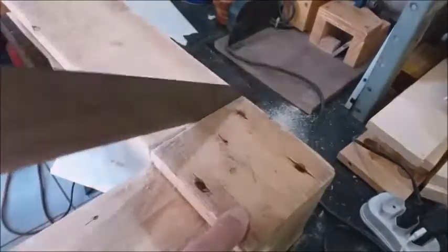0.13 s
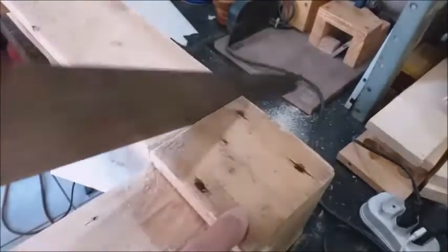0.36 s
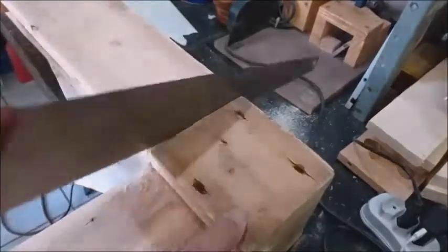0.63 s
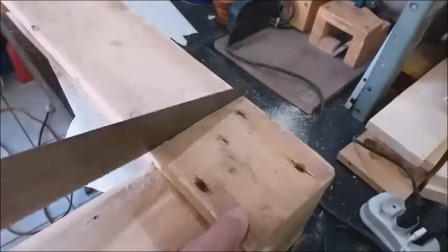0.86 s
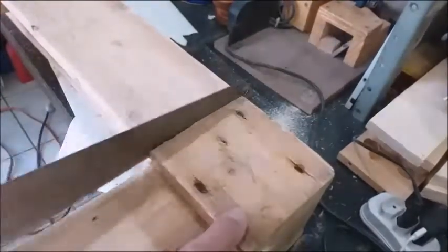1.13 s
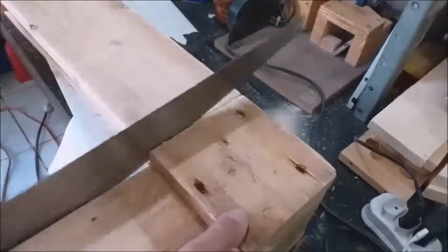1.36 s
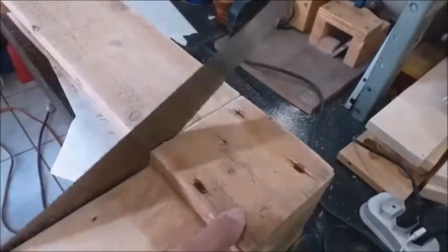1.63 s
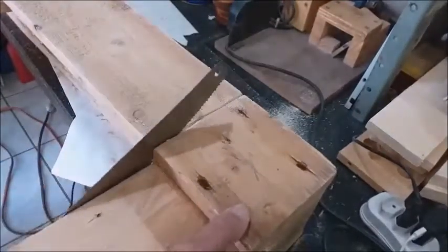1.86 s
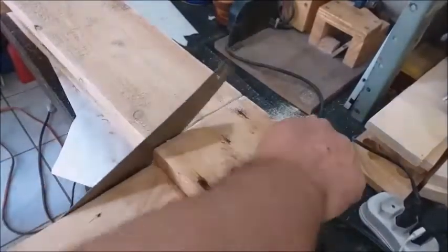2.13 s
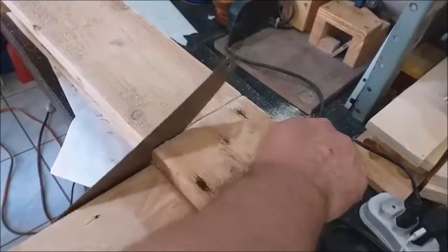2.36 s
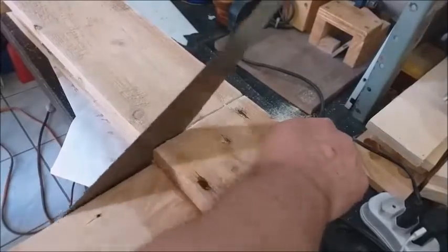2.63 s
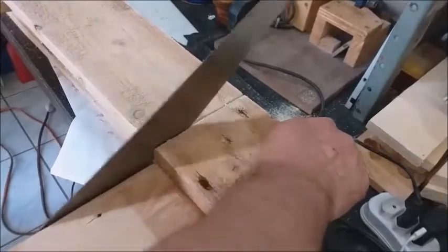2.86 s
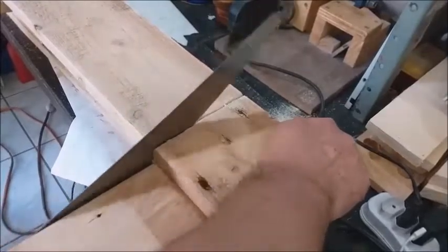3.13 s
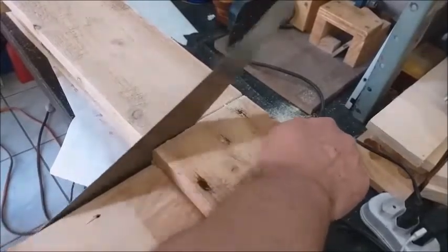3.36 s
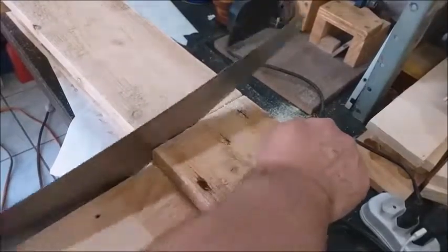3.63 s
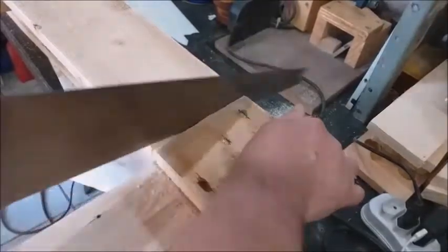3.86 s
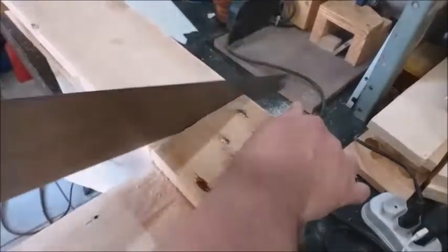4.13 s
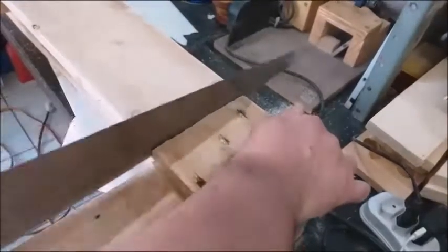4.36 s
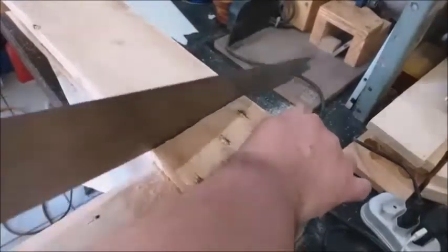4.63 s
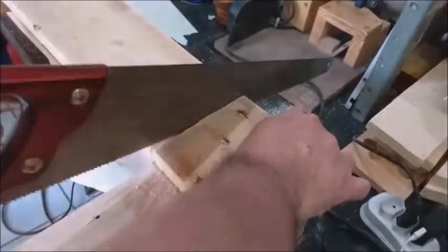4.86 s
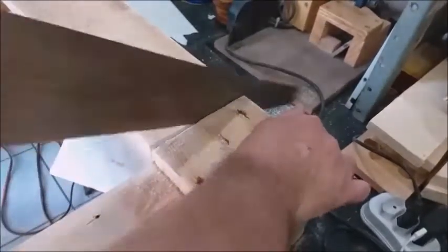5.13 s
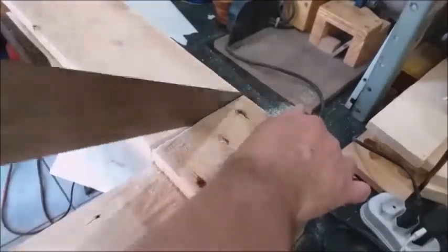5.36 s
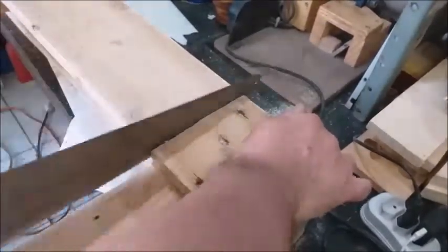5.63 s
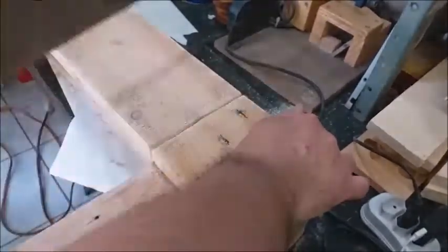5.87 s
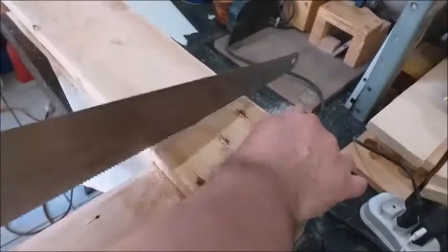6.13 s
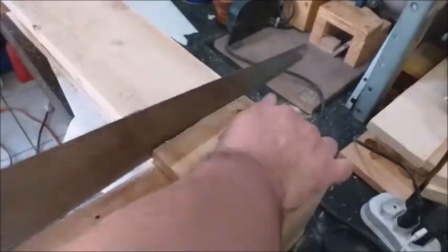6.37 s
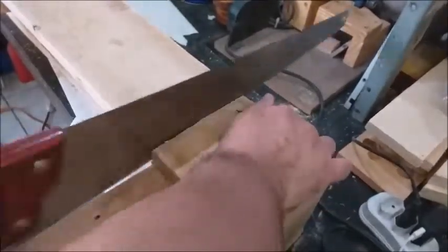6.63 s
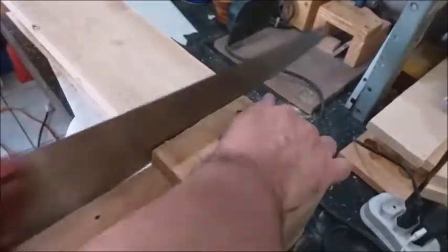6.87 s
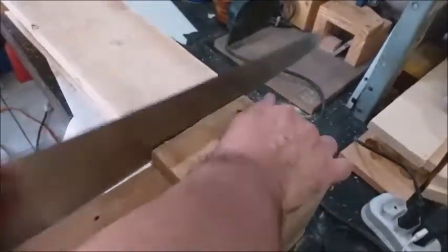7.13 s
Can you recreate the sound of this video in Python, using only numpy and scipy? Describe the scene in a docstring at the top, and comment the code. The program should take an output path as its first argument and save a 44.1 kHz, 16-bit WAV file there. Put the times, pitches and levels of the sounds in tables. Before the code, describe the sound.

From the start a handsaw cuts softwood close by, around fourteen strokes a second, alternating weaker pulls and stronger pushes. Each is a short swell of gritty tooth bites, with woody thump, steely rasp around 2.5 to 4 kHz and fibrous hiss. Strokes grow louder and more metallic around 1.2 to 1.5 s. At about 1.8 s sawing stops; the blade taps and brushes the wood, and a tiny very high squeak sounds near 2.05 s. Strokes return at 2.15 s, break again at 2.4 to 2.55 s with knocks, then run on, weakening around 3.4 to 3.8 s and strengthening from 4 s. From 5.8 to 6.5 s a pause leaves wavering blade rings, low thumps and faint brushes. Vigorous sawing resumes to the end at about 7.2 s. Behind lie faint hiss, murmur and hum; the thin phone sound occasionally warbles.

```python
"""A handsaw heard at about fourteen strokes a second in a softwood block, close to a phone; three short pauses.
Each stroke is a swell of tooth bites: the bites thump the block, tearing fibres ring the steel blade and hiss.
In the pauses the blade brushes and taps the wood, blade rings and low wood thumps fade, one thin squeak sounds.
Behind it lie a workshop's faint hiss, murmur and low hum; now and then the sound thins to a brief warble."""
import sys
import numpy as np
from scipy import signal
from scipy.io import wavfile
from scipy.ndimage import uniform_filter1d

SR = 44100
rng = np.random.default_rng(int(sys.argv[2]) if len(sys.argv) > 2 else 0)


def voltage_ratio(level):
    """Linear amplitude factor for a level in decibels (scalar or array-like)."""
    return 10 ** (np.asarray(level, float) / 20)


def dump(signal):
    """Clip the signal to [-1, 1] and save it as 16-bit WAV at the path in sys.argv[1]."""
    limited = np.clip(np.atleast_2d(signal).T, -1, 1)
    pcm = np.round(limited * 32767).astype(np.int16)
    wavfile.write(sys.argv[1], SR, pcm)


N = 319463  # length in samples


def table(rows):
    """Columns of a table."""
    return np.array(rows, float).T


def unit(x):
    """Scaled to rms 1."""
    return x / np.sqrt(np.mean(x ** 2))


def ring(x, hz, width):
    """One resonance, gain 1 at its centre."""
    return signal.lfilter(*signal.iirpeak(hz, hz / width, SR), x)


def band(x, lo_hz, hi_hz):
    """Band-pass."""
    return signal.sosfilt(signal.butter(2, [lo_hz, hi_hz], "bandpass", fs=SR, output="sos"), x)


def walk(rate):
    """Random levels, rate a second, joined by straight lines; spread near 1."""
    levels = rng.standard_normal(8192)
    return np.interp(np.arange(N) * rate / SR, np.arange(len(levels)), levels)


def fade(t, s, db, t60):
    """Sudden start at s, then 60 dB down in t60 seconds."""
    return voltage_ratio(db - 60 * np.maximum(t - s, 0) / t60) * (t >= s)


def room(x, t60, wet_db):
    """A short diffuse tail from near walls and benches."""
    lag = np.arange(SR) / SR
    tail = unit(rng.standard_normal(len(lag)) * fade(lag, 0.0014, 0, t60)) / np.sqrt(len(lag))
    return x + voltage_ratio(wet_db) * signal.fftconvolve(x, tail)[:N]


# Moments when the sound thins to a warble. Each row: middle in seconds.
WARBLE_TIMES = [.064, .128, .189, .673, .824, 1.075, 1.095, 1.12, 1.3, 1.321, 1.376, 1.402, 1.576, 1.654,
                2.245, 2.258, 2.302, 2.354, 2.4, 2.592, 2.749, 2.879, 3.387, 3.439, 3.532, 3.837, 3.895,
                3.913, 4.052, 4.203, 4.223, 4.525, 4.542, 4.6, 4.615, 5.291, 5.309, 5.436, 5.634, 6.19,
                6.264, 6.667, 6.713, 6.801, 6.946, 7.111]


def thinning(x, gap_db):
    """Now and then the whole sound thins for a moment to its few brightest lines, like a brief warble."""
    warble_s = 0.019  # whole length of one warble
    _, s, spec = signal.stft(x, SR, nperseg=1024, noverlap=768)
    distance = np.abs(s[:, None] - WARBLE_TIMES).min(axis=1)
    moments = np.clip(2 - 4 * distance / warble_s, 0, 1)
    # a bright line stands above its neighbours in pitch
    held = uniform_filter1d(np.abs(spec), size=7)
    bright = uniform_filter1d(held, size=3, axis=0) > 1.33 * uniform_filter1d(held, size=24, axis=0)
    change_db = np.where(bright, 4.0, gap_db)
    return signal.istft(spec * voltage_ratio(moments * change_db), noverlap=768)[1][:N]


def workshop():
    """Faint hiss, brightest on top, a wavering murmur of machines and a low hum, all from filtered noise."""
    air = rng.standard_normal((3, N))
    hiss = voltage_ratio(-50) * band(band(air[1], 3900, 18000), 3900, 18000)
    murmur = voltage_ratio(-53 + 3 * walk(9)) * band(air[0], 600, 2600)
    hum = voltage_ratio(-59.5) * unit(ring(ring(air[2], 280, 170), 280, 170))
    return hiss + murmur + hum


def squeak(t):
    """A thin, very high squeak that rises and levels off, its pitch trembling."""
    hz = 15400 - 1700 * np.exp(-np.clip(t - 2.027, 0, 1) / 0.014) + 350 * walk(900)
    swell = np.interp(t, [2.024, 2.045, 2.095], [0, 1, 0])
    return voltage_ratio(-41) * swell * np.sin(2 * np.pi * np.cumsum(hz) / SR)


# Blade rings and a few short low wood thumps.
# Each row: start in seconds, middle pitch in Hz, middle level in dB, time to fall 60 dB in seconds.
FADING_TONES = [(5.895, 2240, -46, .45), (5.9, 2385, -49, .2), (5.95, 3950, -64, .7), (5.83, 571, -49, 1.1),
                (6.205, 2385, -46, .08), (6.137, 610, -46, .07), (6.137, 335, -44, .07),
                (6.3, 346, -45, .3), (6.295, 9843, -41, .25), (6.295, 10015, -42, .2),
                (6.33, 956, -52, .45)]


def rings_and_low_thumps(t):
    """Blade rings and a few short low wood thumps, fading unsteadily in level and pitch."""
    out = 0
    for s, hz, db, t60 in FADING_TONES:
        level = fade(t, s, db + 4.25 * walk(45), t60)
        cycles = hz * np.cumsum(1 + 0.004 * walk(6.4)) / SR
        out = out + level * np.sin(2 * np.pi * cycles)
    return out


# The blade knocks the wood.
# Each row: start in seconds, level in dB on top of the rattle's own, time to fall 60 dB in seconds.
KNOCKS = [(1.833, -32, 0.045), (1.95, -35.5, 0.1), (2.113, -38, 0.067), (2.402, -29.5, 0.089),
          (2.531, -35, 0.021), (6.137, -57, 0.059), (6.204, -49.5, 0.22)]


def taps(t, rattle):
    """A sudden burst of the blade's rattle and the block's thump that dies quickly."""
    return rattle * sum(fade(t, s, db, t60) for s, db, t60 in KNOCKS)


# How the saw is held. Each row: time in seconds, blade angle from 0 flat to 1 steep,
# hand pressing on the block from 0 to 1.
POSTURE_PATH = [(0.2, 0.031, 0.66), (0.9, 0.059, 0.77), (1.1, 0.031, 0.75), (1.3, 0.89, 0.39),
                (1.47, 0.94, 0.42), (1.8, 0.99, 0.32), (2.3, 0.98, 0.69), (2.7, 0.98, 0.29),
                (3.7, 0.91, 0.074), (3.9, 0.043, 0.98), (5.6, 0.38, 0.97), (6.4, 0.72, 0.99),
                (7.2, 0.52, 1)]


def posture(t):
    """Blade angle and hand pressure at the times t, gliding from row to row."""
    at, steep, pressed = table(POSTURE_PATH)
    return np.interp(t, at, steep), np.interp(t, at, pressed)


# Pull and push strokes in turn, a pull first.
# Each row: mid-stroke in seconds, length in ms, blade rasp level in dB.
SAW_STROKES = [(0.04, 61, -24.5), (0.113, 39, -19.5), (0.178, 51.6, -22.5), (0.262, 39.6, -20),
               (0.334, 46.6, -23), (0.406, 36.3, -21), (0.48, 52, -26), (0.559, 38, -20.5), (0.63, 63, -27),
               (0.704, 41.3, -22), (0.787, 64, -30), (0.863, 40.8, -19), (0.934, 55, -23),
               (1.01, 47, -21.5), (1.081, 76, -26), (1.151, 44.6, -17), (1.217, 56, -22.5),
               (1.291, 54.6, -16.5), (1.362, 45.7, -18.5), (1.419, 40.6, -15.5), (1.493, 36.8, -16),
               (1.568, 41.7, -23), (1.649, 36.6, -19), (1.72, 37.7, -19), (1.801, 44.6, -23),
               (2.155, 49.7, -24.5), (2.24, 47.7, -21), (2.3, 35, -15), (2.372, 40.7, -19),
               (2.575, 39, -26.5), (2.645, 31.6, -27), (2.694, 42.5, -24), (2.745, 55, -17.5),
               (2.804, 37.8, -19), (2.876, 47.7, -21), (2.924, 28.6, -13.5), (2.994, 40, -24),
               (3.041, 34.6, -19.5), (3.113, 41.7, -23), (3.166, 38, -20), (3.232, 47, -24.5),
               (3.281, 30.8, -20), (3.357, 42, -28), (3.399, 53, -26), (3.476, 35.3, -25.5),
               (3.526, 42, -28), (3.594, 39.7, -30), (3.642, 42, -26.5), (3.729, 50.5, -28),
               (3.842, 53.8, -32), (3.919, 53.5, -25), (3.991, 34.4, -15.5), (4.057, 60, -21.5),
               (4.129, 43.5, -19.5), (4.2, 68, -26), (4.266, 45.7, -19), (4.337, 60, -24),
               (4.403, 37.4, -20.5), (4.477, 50.6, -26), (4.541, 44.3, -21), (4.621, 58, -28.5),
               (4.68, 34.7, -20), (4.755, 52.6, -28), (4.82, 36.7, -20.5), (4.886, 53.3, -28),
               (4.954, 32.5, -19), (5.028, 68.7, -26), (5.105, 32, -20), (5.177, 49, -26),
               (5.246, 31.9, -19), (5.314, 47.7, -23), (5.384, 41.5, -19), (5.449, 50.8, -22.5),
               (5.522, 41.2, -20), (5.59, 53.5, -23.5), (5.661, 38, -20.5), (5.728, 45, -22),
               (5.793, 39.2, -18.5), (6.508, 47.2, -24), (6.579, 34.8, -13.5), (6.656, 48.4, -26.5),
               (6.722, 38.3, -18.5), (6.794, 50.7, -25.5), (6.857, 34, -18.5), (6.925, 58, -23),
               (6.989, 32.4, -19.5), (7.053, 51, -22.5), (7.123, 38.3, -19), (7.202, 48, -25.5),
               (7.25, 16.3, -13)]
# The idle blade brushes the wood in the pauses.
# Each row: middle in seconds, length in ms, blade rasp level in dB.
IDLE_BRUSHES = [(1.89, 57, -49), (2.07, 70, -52.5), (2.462, 37, -41), (5.875, 60.6, -41),
                (6.316, 64, -38.5), (6.41, 104, -55.5)]
# How a push stroke cuts, before chance is added. Each row: time in seconds, teeth a second,
# block thump in dB above the rasp, hiss in dB above the rasp.
PUSH_CUT = [(0.1, 650, -6, -2.5), (0.45, 740, -3.5, -1), (0.75, 603, -10, -2.5), (1.15, 724, -16.5, -3),
            (1.33, 673, -18.5, -8), (1.45, 390, -10, -15.5), (1.8, 483, -7, -7), (2.2, 580, -6, -7.5),
            (2.35, 605, -9.5, -17), (2.7, 580, -3.5, -2.5), (2.95, 600, -8.5, -9), (3.3, 460, -8.5, -3),
            (3.65, 423, -1.5, -2.5), (3.95, 890, -18, -4), (4.2, 800, -10, 1), (4.45, 594, -9, -5.5),
            (4.8, 603, -8, -1), (5.5, 576, -8.5, -2.5), (5.64, 590, -5.5, 0.5), (5.75, 553, -4, -5),
            (6.55, 553, -5.5, -3.5), (6.85, 856, -10, -0.5), (7.2, 773, -7.5, -0.5)]
# Chance spread from stroke to stroke, one row: share of the teeth rate, thump in dB, hiss in dB.
SCATTER = (.06, 0.66, 1)


def strokes():
    """Each stroke's time, length and level, with tooth rate and colour from its direction and the blade's angle."""
    s, ms, rasp_db = table(SAW_STROKES + IDLE_BRUSHES)
    order = np.arange(len(s))
    pull = (order % 2 == 0) & (order < len(SAW_STROKES))  # brushes cut like pushes
    at, *push = table(PUSH_CUT)
    teeth, thump_db, hiss_db = (np.interp(s, at, column) for column in push)
    steep, _ = posture(s)

    def by_angle(flat_value, steep_value):
        return flat_value + steep * (steep_value - flat_value)

    # a pull differs from a push
    teeth = teeth * np.where(pull, by_angle(0.86, 1.1), 1)
    thump_db = thump_db + pull * by_angle(2.5, -2.5)
    hiss_db = hiss_db + pull * by_angle(-0.5, -3.5)
    luck = rng.standard_normal((len(s), 3)).T * np.array(SCATTER)[:, None]
    return s, ms, rasp_db, teeth * (1 + luck[0]), thump_db + luck[1], hiss_db + luck[2]


def body(force, modes, share, waver_db, drift):
    """Modes, each driven by its own force; levels follow the posture, levels and pitches waver as the blade slides."""
    out = 0
    for hz, width, db, other_db in modes:
        # shift the mode down to 0 Hz, smooth there, and shift back
        turn = np.exp(2j * np.pi * np.cumsum(hz * (1 + drift * walk(14))) / SR)
        pole = np.exp(-np.pi * width / SR)
        mode = 2 * (turn * signal.lfilter([1 - pole], [1, -pole], force() / turn)).real
        out = out + voltage_ratio(db + share * (other_db - db) + waver_db * walk(30)) * mode
    return unit(out)


def sheet(x, depth_db):
    """Thin steel has too many modes to count; as the free length slides, some light up and others go dark."""
    spec = signal.stft(x, nperseg=1024)[2]
    rows, columns = spec.shape
    ripple = rng.standard_normal((rows // 2 + 1, columns // 2 + 1))
    ripple = np.repeat(np.repeat(ripple, 2, axis=0), 2, axis=1)[:rows, :columns]
    return unit(signal.istft(spec * voltage_ratio(depth_db * ripple))[1][:N])


# Resonances of the wood block. Each row: middle pitch in Hz, width in Hz,
# relative level in dB held lightly, relative level in dB pressed.
BLOCK_MODES = [(373.6, 48, 8, -10), (466.6, 39, -6.5, 0), (608, 58, -23.5, 1.5), (1095, 40, -3, 0.5),
               (1292, 58, -1.5, -1), (953, 170, -8.5, -10.5), (1787, 175, -29, -13), (1433, 24, -8, -2.5)]


def block_thump(pressed, tooth, bite, phase, fibres):
    """Bites and tearing fibres shake the block's modes."""
    bites = unit(np.diff(tooth, prepend=0))
    thump = body(lambda: bites + 3.45 * fibres(), BLOCK_MODES, pressed, waver_db=3.56, drift=0.043)
    # the beat of the teeth is also a rough note with its octave, clearer when the block is held firm
    note = np.sin(2 * np.pi * phase) + 0.73 * np.sin(4 * np.pi * phase)
    return unit(thump + 0.77 * pressed * bite * note)


# Resonances of the steel blade. Each row: middle pitch in Hz, width in Hz,
# relative level in dB blade flat, relative level in dB blade steep.
BLADE_MODES = [(2598, 175, -3, -8.5), (2861.5, 93, -2, 5), (3082, 224, -3.5, 1), (3537, 117, 3.5, 0),
               (2305, 130, -10.5, -22), (3850, 290, -2.5, -24), (4136, 790, -5.5, -10),
               (4500, 3530, -17.5, -13)]


def blade_rasp(steep, bite, phase, white, fibres):
    """Tearing fibres ring the blade's modes; each tooth also catches with a sharp tick of random strength."""
    new_tooth = np.diff(phase.astype(int), prepend=0) > 0
    ticks = unit(bite * voltage_ratio(3.8 * white) * new_tooth)
    return body(lambda: fibres() + 0.49 * ticks, BLADE_MODES, steep, waver_db=2.17, drift=0.011)


# Broad and narrow peaks of the hiss. Each row: pitch in Hz, width in Hz, peak gain in dB before the band-pass.
HISS_MODES = [(6480, 2000, -3.5), (7540, 41, 5), (8510, 38, 2.5), (11900, 10700, -7)]


def fibre_hiss(fibres):
    """Tearing fibres heard through a few high resonances."""
    peaks = sum(voltage_ratio(db) * ring(fibres(), hz, width) for hz, width, db in HISS_MODES)
    return unit(band(peaks, 4200, 21800))


def saw(t):
    """Strokes swell and die; teeth bite at a rate that follows the speed. Returns the cut and a steady rattle."""
    s, ms, rasp_db, teeth, thump_db, hiss_db = strokes()
    coarse = t[::32]
    # -1 at the start of a stroke, 1 at its end
    place = (coarse - s[:, None]) / (ms[:, None] / 2000)
    # each stroke swells to its middle and dies away, its far tail a little longer
    slope = np.where(place < 0, 2.2, 1.6)
    swell_db = rasp_db[:, None] - 9.0 * np.abs(place) ** slope - 1.5 * place
    now = np.argmax(swell_db, axis=0)  # the loudest stroke at each moment
    place = np.clip(place[now, np.arange(len(now))], -2, 2)
    effort = voltage_ratio(np.interp(t, coarse, swell_db.max(axis=0)) + 1.36 * walk(160))

    # the blade slows through the stroke and its teeth are not quite even
    speed = np.interp(t, coarse, teeth[now] * (1 - 0.12 * place))
    phase = np.cumsum(speed * (1 + 0.02967 * walk(400))) / SR  # counted in teeth
    bite = voltage_ratio(1.88 * rng.standard_normal(N))[phase.astype(int)]
    tooth = bite * np.exp(1.2 * (np.cos(2 * np.pi * phase) - 1))
    # fibres snap in grains, thickest while a tooth bites
    grain = voltage_ratio(2.0 * rng.exponential(size=N)) * (0.56 + tooth)
    white = rng.standard_normal(N)

    def fibres():
        return np.roll(white, rng.integers(N)) * grain

    steep, pressed = posture(t)
    thump = block_thump(pressed, tooth, bite, phase, fibres)
    rasp = blade_rasp(steep, bite, phase, white, fibres)
    hiss = fibre_hiss(fibres)

    def share(db):
        return np.interp(t, coarse, uniform_filter1d(voltage_ratio(db[now]), size=8))

    cut = rasp + share(thump_db) * thump + share(hiss_db) * hiss
    rattle = rasp + hiss + 0.8 * thump
    return effort * np.std(cut) * sheet(cut, depth_db=3.83), rattle


def scene():
    """Saw and taps in the room, with fading tones, squeak and the workshop's floor added."""
    t = np.arange(N) / SR
    cut, rattle = saw(t)
    in_room = room(cut + taps(t, rattle), t60=0.096, wet_db=-10.0)
    heard = in_room + rings_and_low_thumps(t) + squeak(t) + workshop()
    return thinning(heard, gap_db=-25)[None]


def low_pass(x):
    """Removes everything above the highest recorded frequency."""
    return signal.sosfilt(signal.butter(12, 16940, fs=SR, output="sos"), x)


def record(dry):
    """The phone rounds the loudest peaks and cuts bass and top steeply."""
    rounded = np.tanh(1.612 * dry) / 1.49
    thin = signal.sosfilt(signal.butter(6, 290, "highpass", fs=SR, output="sos"), rounded)
    thin = thin + voltage_ratio(-20.0) * dry  # a trace of bass gets through
    mix = signal.sosfilt(signal.ellip(12, 0.2, 70, 15700, fs=SR, output="sos"), thin)
    return low_pass(mix)


dry = scene()
out = record(dry)
dump(out)
```